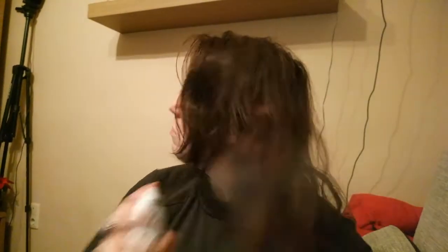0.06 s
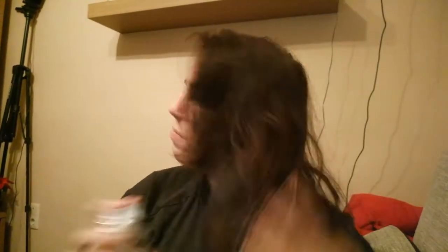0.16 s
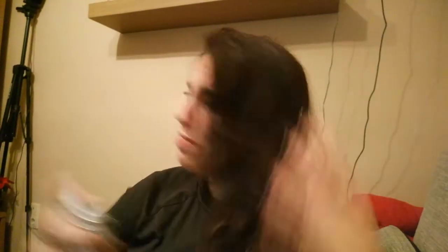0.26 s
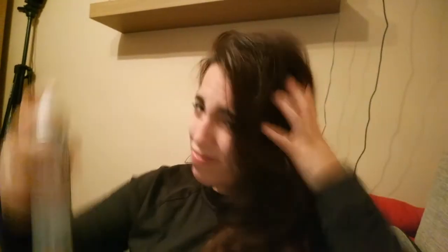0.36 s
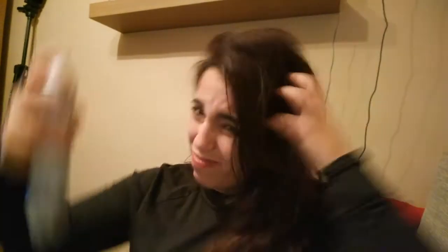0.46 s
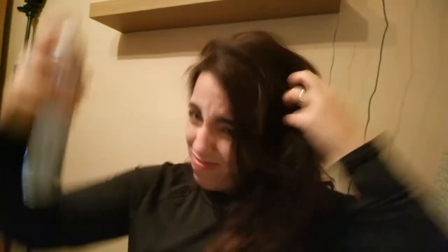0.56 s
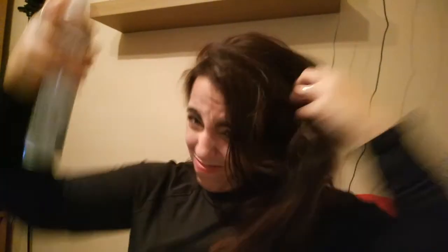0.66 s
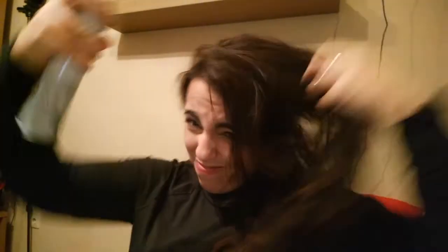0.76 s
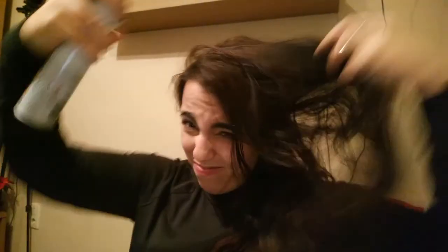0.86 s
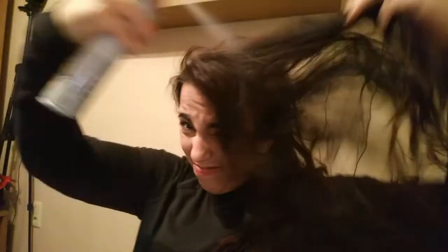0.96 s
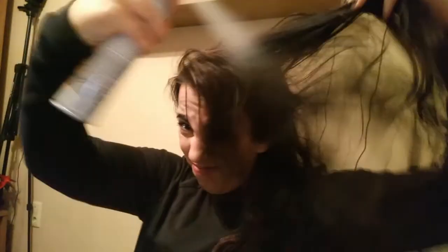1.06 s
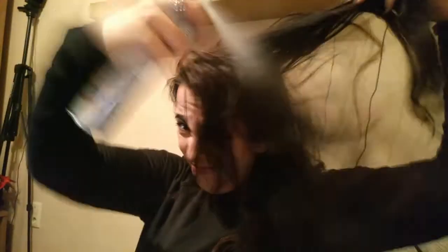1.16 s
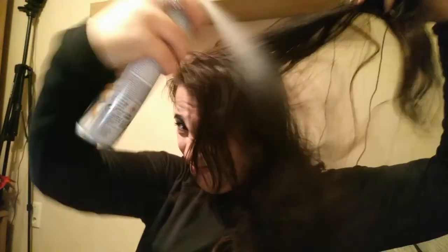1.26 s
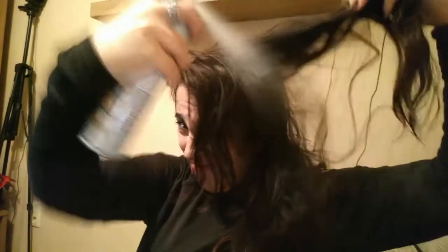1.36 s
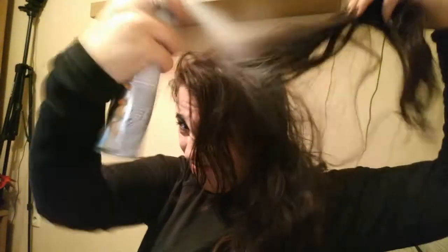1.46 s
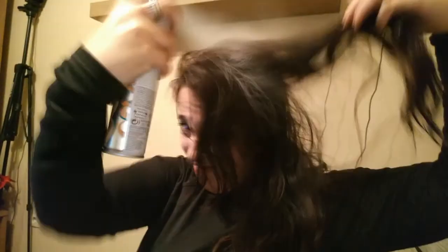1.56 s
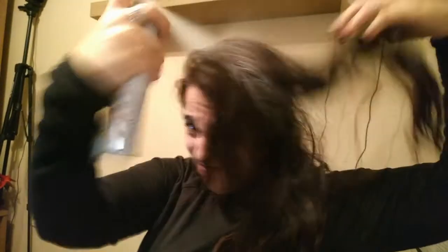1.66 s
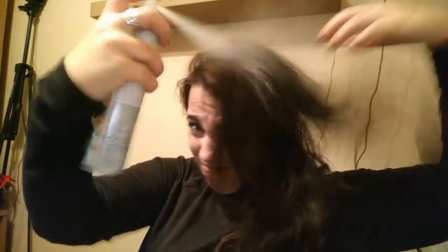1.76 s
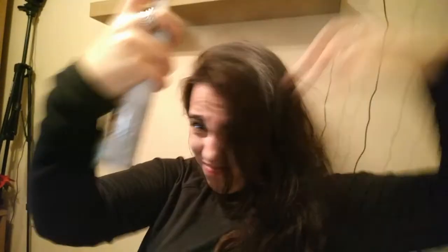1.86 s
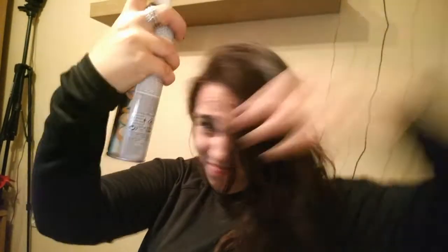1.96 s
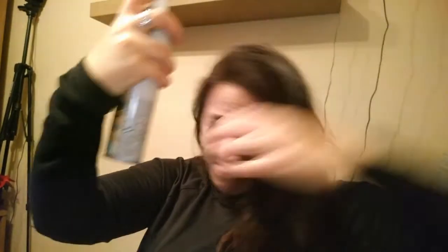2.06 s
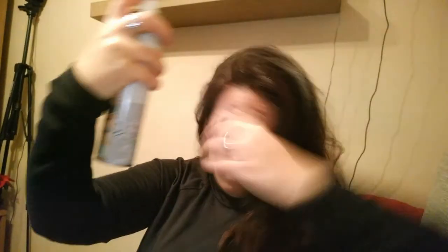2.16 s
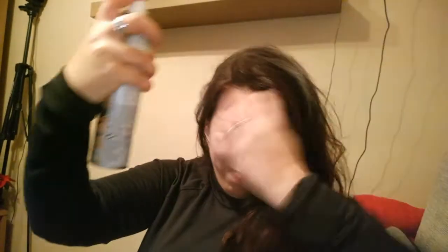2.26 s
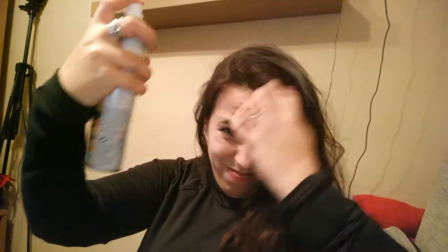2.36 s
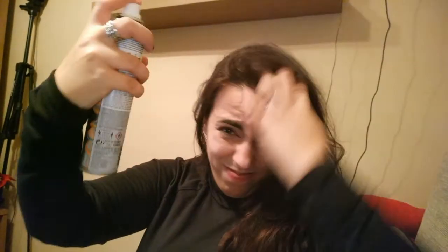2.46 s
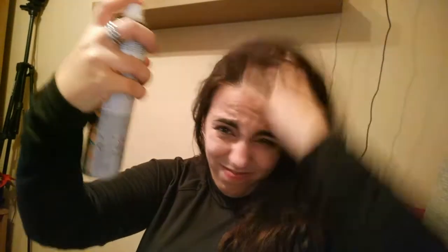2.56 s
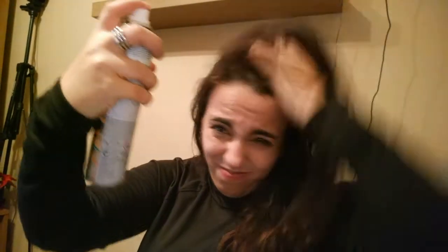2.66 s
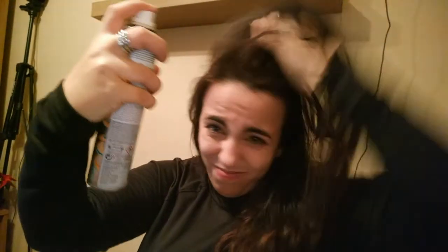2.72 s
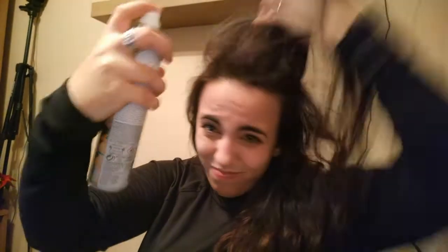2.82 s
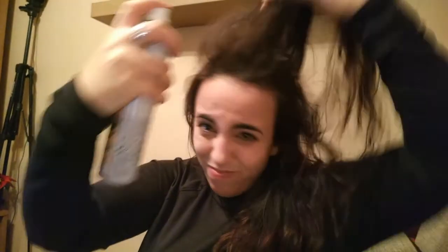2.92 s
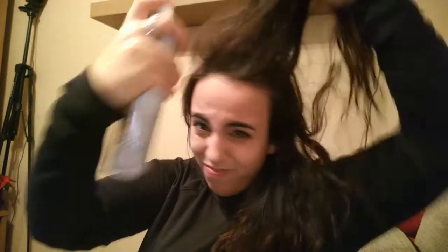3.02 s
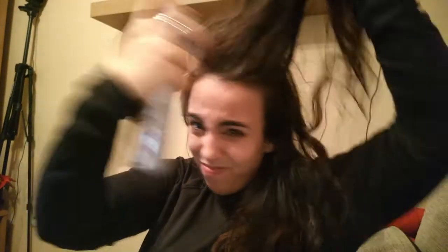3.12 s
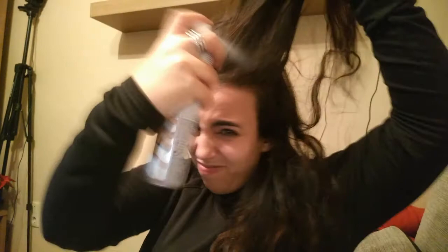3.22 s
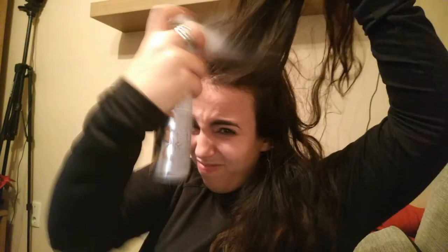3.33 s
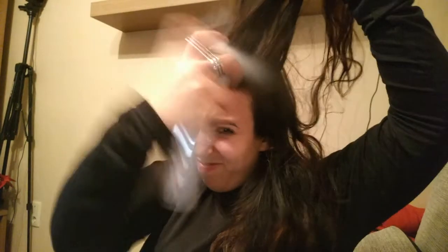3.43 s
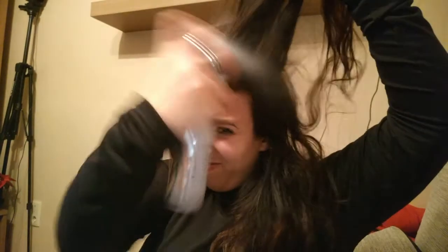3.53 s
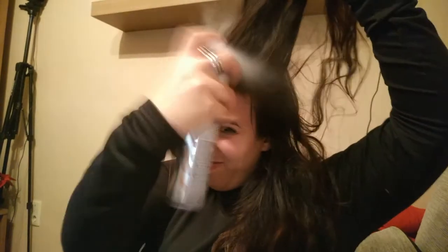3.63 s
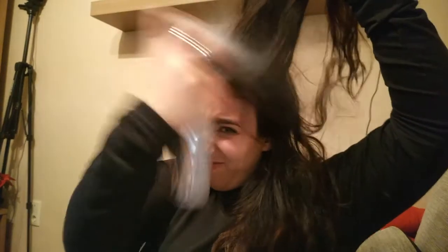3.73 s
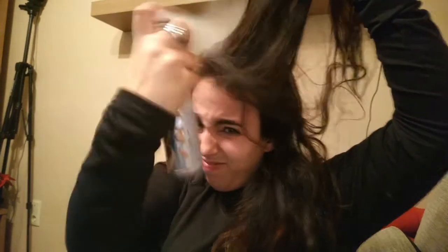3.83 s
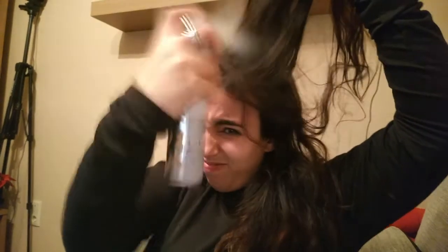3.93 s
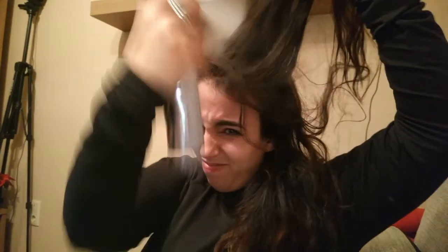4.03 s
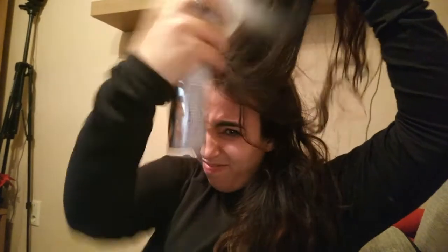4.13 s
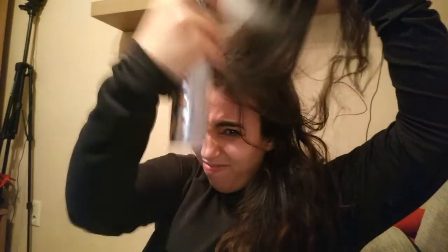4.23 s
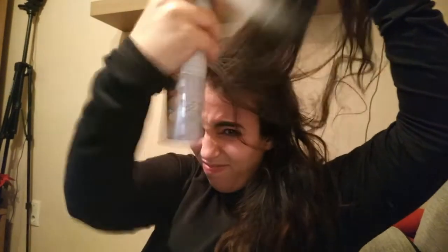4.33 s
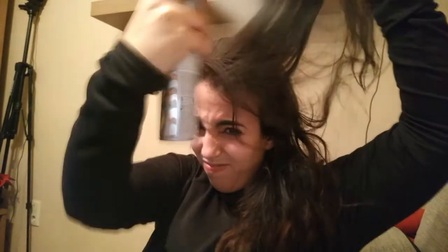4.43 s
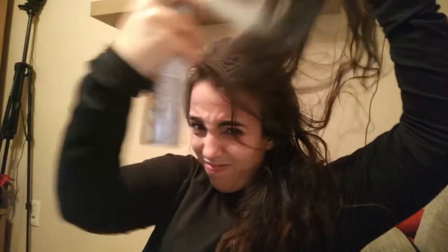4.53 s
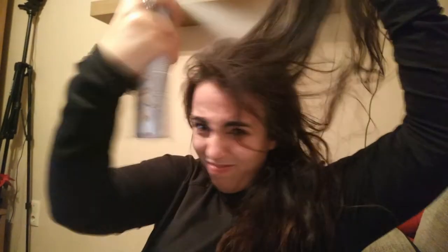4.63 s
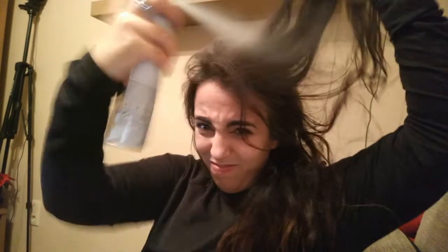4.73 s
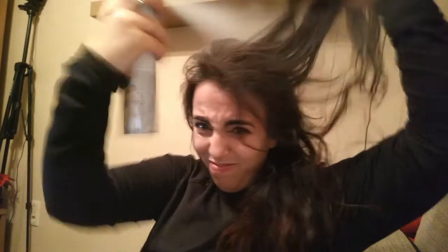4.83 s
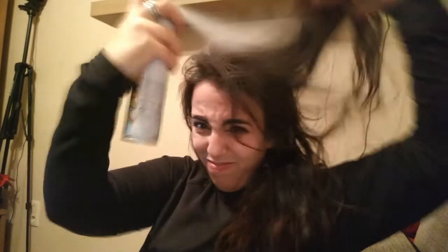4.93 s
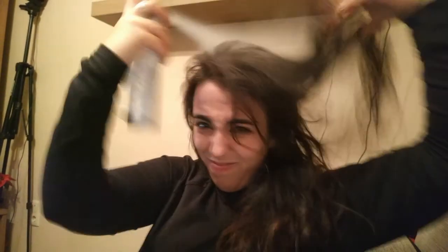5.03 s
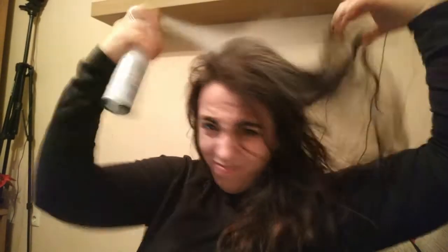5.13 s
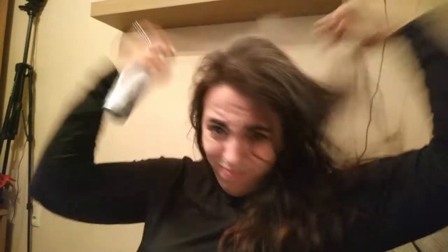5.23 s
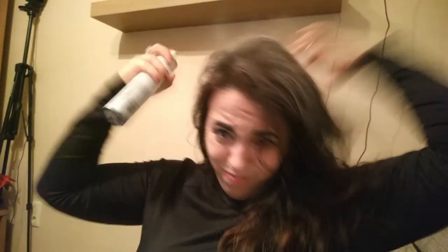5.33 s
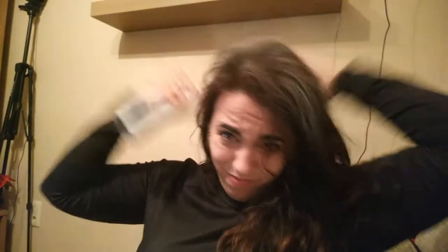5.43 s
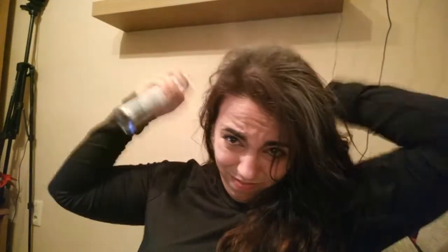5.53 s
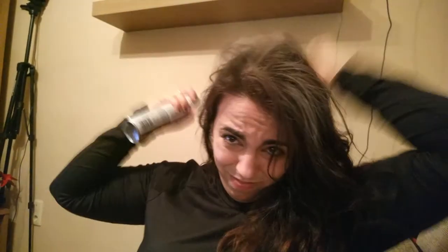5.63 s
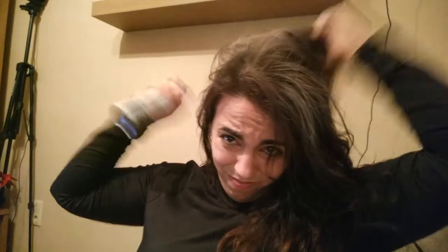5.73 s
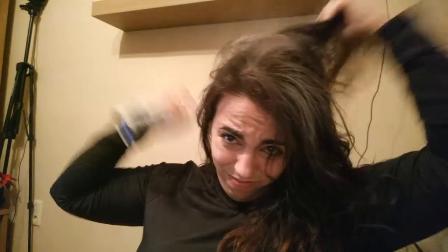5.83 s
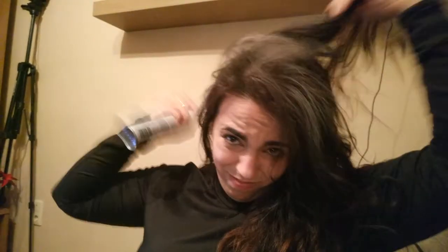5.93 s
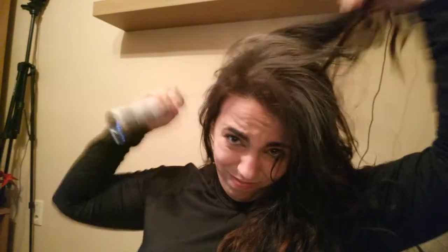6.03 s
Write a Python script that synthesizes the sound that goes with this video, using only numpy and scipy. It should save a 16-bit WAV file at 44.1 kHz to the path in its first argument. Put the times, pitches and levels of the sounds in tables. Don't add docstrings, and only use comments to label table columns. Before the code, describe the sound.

The last echo of a spray dies away in a small furnished room. After a short near-silence an aerosol can hisses for just under a second, stops cleanly, and the button creaks faintly. Then a long spray hisses on to the end, bright with a duller roar and hollow can tone, shifting as the can is waved. A phone about an arm's length away picks it up in stereo over a faint fan-like floor.

```python
import sys
import numpy as np
from scipy import signal
from scipy.fft import rfft, irfft, next_fast_len
from scipy.io import wavfile
from scipy.ndimage import uniform_filter1d

SR = 44100
rng = np.random.default_rng(int(sys.argv[2]) if len(sys.argv) > 2 else 0)


def decibels_to_gain(level_db):
    exponent = np.asarray(level_db, float) / 20
    return 10 ** exponent


def int16_out(signal):
    q = np.round(np.clip(np.atleast_2d(signal).T, -1, 1) * 32767)
    wavfile.write(sys.argv[1], SR, q.astype(np.int16))


N = 268128
LEAD_IN = 13230
TOTAL = next_fast_len(N + LEAD_IN + SR)
HZ = np.fft.rfftfreq(TOTAL, 1 / SR)
T = (np.arange(TOTAL) - LEAD_IN) / SR

# valve cracks in seconds, first flow in dB re full, fully open in seconds,
# let go in seconds, full flow in dB.
PRESSES = [
    (-.4, -5, -.3, -.062, -21.5),
    (.942, -6, 1.004, 1.813, -21.6),
    (3.112, -19, 3.184, 6.3, -20.6),
]
# time in seconds, turn from 0 to 1.
NOZZLE_TURN = [(0, .6), (.95, .3), (1.15, .33), (1.3, .03), (1.5, .3), (1.64, .4), (1.74, .3), (1.82, .35),
               (3.15, .0), (3.5, .08), (3.95, .05), (4.13, .33), (4.4, .2), (4.8, .27), (5.1, .7),
               (5.5, .85), (5.7, .95), (6.08, 1.1)]
# centre in Hz, width in Hz, level in dB.
CAN_MODES = [(812, 78, 3.5), (702, 40, -6), (1444, 70, -9.5), (1900, 180, -10), (2327, 85, -13)]
# start in seconds, peak in dB, pitch in Hz, left minus right in dB.
CREAKS = [
    (2.497, -42, 8000, 7),
    (2.499, -30, 3820, -19),
    (2.5022, -26, 8470, 24),
    (2.504, -33, 4850, -8),
    (2.5068, -32, 3700, 4),
    (2.5097, -34, 6000, 2),
    (2.522, -35, 5400, 2),
]
# centre in seconds, peak in dB, pitch in Hz, length in seconds.
THUDS = [
    (5.385, -44.5, 227, 0.024),
    (5.40, -38, 465, 0.009),
    (5.433, -43, 230, 0.034),
    (5.605, -51, 212, 0.024),
    (5.853, -49.5, 264, 0.031),
]
# frequency in Hz, gain in dB.
LEFT_PORT = [(60, -60), (150, -50), (300, -27.5), (1150, -22.5), (2000, -18), (2750, -19.5), (3400, -18),
             (5000, -16), (7000, -7), (8500, -4), (10200, 5.5), (11500, 2), (12800, 0.5), (15600, 1)]
RIGHT_PORT = [(60, -65), (150, -26), (300, -17.5), (1150, -11), (2000, -8), (2750, -10.5), (3500, -2),
              (4500, -1), (5800, -4), (7500, -2), (9500, 4), (11000, -0.5), (12500, -2.5), (15600, -4)]
# frequency in Hz, correlation from 0 to 1.
LIKENESS = [(60, 0.11), (130, 0.63), (300, 0.51), (700, 0.73), (1400, 0.39), (3000, 0.27), (7000, 0.18),
            (15000, 0.076)]
# frequency in Hz, density in dB per Hz.
FLOOR_SPECTRUM = [(24, -83), (40, -55), (109, -24.5), (143, -27.5), (162, -3), (242, -2.5), (275, 5),
                  (311, -15.5), (335, -1.5), (464, -6), (643, -3.5), (766, -8), (4880, -17.5), (9820, -14),
                  (15800, -21.5)]
# frequency in Hz, left minus right in dB.
FLOOR_TILT = [(60, -6), (110, -26), (200, -2.5), (380, 0), (700, -0.5), (1290, -4.5), (2380, -2),
              (4400, -4), (8120, 2.0), (15000, 6.5)]
# frequency in Hz, threshold in dB re local level.
MASKING_LINE = [(2200, -9), (2900, -2), (4000, -1.2), (7500, -1), (9000, -2.4), (10500, -2.6),
                (12000, -1.4), (15800, -1.3)]

HALF_SIDES = np.array([[.5], [-.5]])


def unit(x):
    return x / np.sqrt(np.mean(x ** 2))


def along(table):
    hz, value = np.transpose(table)
    return np.interp(np.log(HZ + 1), np.log(hz), value)


def shape(x, gain):
    return irfft(rfft(x, TOTAL) * gain, TOTAL)


def resonance(hz, width_hz):
    return 1j * HZ * width_hz / (hz ** 2 - HZ ** 2 + 1j * HZ * width_hz)


def noise_pair():
    alike = np.clip(along(LIKENESS), 0, 1)
    mid, side = rng.standard_normal((2, TOTAL))
    mid = shape(mid, np.sqrt(1 + alike))
    side = shape(side, np.sqrt(1 - alike))
    return np.array([mid + side, mid - side]) / 2


def walk(rate):
    hold = max(int(SR / rate), 1)
    steps = np.repeat(rng.standard_normal(TOTAL // hold + 1), hold)[:TOTAL]
    return unit(uniform_filter1d(uniform_filter1d(steps, hold), hold))


def jet_noise():
    sputter = decibels_to_gain(2.0 * walk(400) + 1.0 * walk(40))
    top = 1 / (1 + (8200 / (HZ + 1)) ** 8)
    hiss = shape(sputter * rng.standard_normal(TOTAL), np.sqrt(top)) * decibels_to_gain(0.61 * walk(33))
    roar = shape(sputter * rng.standard_normal(TOTAL), np.sqrt(1 - top)) * decibels_to_gain(0.51 * walk(4.8))
    return hiss, roar


def singing_can():
    modes = sum(decibels_to_gain(db) * resonance(hz, width_hz) for hz, width_hz, db in CAN_MODES)
    return unit(shape(rng.standard_normal(TOTAL), modes)) * decibels_to_gain(1.5 * walk(9))


def leak(hiss):
    peak_s, peak_db, rise_db_per_s, fall_db_per_s = .418, -46.5, 500, 450
    below_db = np.maximum(rise_db_per_s * (peak_s - T), fall_db_per_s * (T - peak_s))
    return decibels_to_gain(peak_db - below_db) * hiss


def spray():
    hiss, roar = jet_noise()
    can = singing_can()
    wave_db = 1.0 * walk(7)
    turn = np.interp(T, *np.transpose(NOZZLE_TURN))
    seep_s, crack_s, snap_s, surge_s, let_go_s = .052, .009, .009, .08, .06
    out = leak(hiss)
    for cracks, first_db, opens, shuts, flow_db in PRESSES:
        seeps = cracks - crack_s - seep_s
        stages = [seeps, cracks - crack_s, cracks, opens - snap_s, opens]
        lost_db = np.interp(T, stages, [-42, -34, first_db, -4.5, 0])
        can_wakes_db = np.interp(T, stages, [-42, -32, -14, -11, 0])
        surge_db = 1.2 * np.exp(-np.abs(T - opens) / surge_s) * (T > opens)
        choke = np.clip(-lost_db / 20, 0, 1)
        closing = np.clip(1 + (T - shuts) / let_go_s, 0, 1)

        roar_db = -3.5 - 11 * turn - 3.5 * closing + 5.5 * choke
        can_db = -14.3 - 11 * turn - 6 * closing + can_wakes_db - lost_db
        hiss_lean_db = 2.8 + 1.2 * turn + 5 * closing + 8 * choke + wave_db - 3.0
        roar_lean_db = -6 + 3 * turn + 7 * closing + 4 * choke + wave_db + 8.5

        low = decibels_to_gain(roar_db + 9.5) * roar + decibels_to_gain(can_db + 13.5) * can
        jet = decibels_to_gain(HALF_SIDES * hiss_lean_db) * hiss + decibels_to_gain(HALF_SIDES * roar_lean_db) * low
        valve = np.clip((T - seeps) / 0.003, 0, 1) * np.clip((shuts + 0.0063 - T) / .012, 0, 1)
        thrown_back_db = 1.3 * turn
        out = out + valve * decibels_to_gain(flow_db + lost_db + surge_db + thrown_back_db + 4.5) * jet
    return out


def creaks():
    out = np.zeros((2, TOTAL))
    age = np.arange(400) / SR
    for start_s, db, hz, lean_db in CREAKS:
        ring = np.sin(2 * np.pi * hz * age) * np.exp(-age / 0.00026)
        ring = ring + 0.38 * rng.standard_normal(400) * np.exp(-age / 0.0045)
        ring = ring * np.clip(age / 0.00012, 0, 1)
        i = LEAD_IN + int(start_s * SR) - 16
        out[:, i:i + 400] += decibels_to_gain(db + HALF_SIDES * lean_db) * ring
    plastic = resonance(4600, 2600) + 0.36 * resonance(9100, 4500) + .02
    no_bass = HZ ** 2 / (HZ ** 2 + 2000. ** 2)
    port_limits = 1 / (1 + (HZ / np.array([[12000.], [9500.]])) ** 6)
    return shape(out, plastic * no_bass * port_limits)


def thuds():
    out = 0
    for centre_s, db, hz, length_s in THUDS:
        rumble = unit(shape(rng.standard_normal(TOTAL), resonance(hz, 0.24 * hz) ** 2))
        out = out + decibels_to_gain(db) * np.exp(-((T - centre_s) / length_s) ** 2) * rumble
    return np.outer(decibels_to_gain([-3.5, 3.5]), out)


def room(x, direct_db, wander):
    stay, tail_length = 4500, 16384
    t60_low_s, t60_high_s = .28, .27
    age = np.arange(tail_length) / SR
    onset = np.clip((age - .002) / 0.0065, 0, 1)
    decay_low, decay_high = 1000. ** (-age / t60_low_s), 1000. ** (-age / t60_high_s)
    treble = HZ ** 2 / (HZ ** 2 + 2700.0 ** 2)
    echoes = noise_pair()
    low, high = shape(echoes, 1 - treble), shape(echoes, treble)
    window = np.sin(np.pi * np.arange(2 * stay) / (2 * stay))
    starts = range(0, TOTAL - tail_length - 2 * stay, stay)
    chance = rng.random((len(starts), 3, 1))
    all_lags = wander * (chance[:, :2] + 6 * chance[:, 2:])
    out = np.zeros((2, TOTAL))
    for i, lags in zip(starts, all_lags):
        tail = onset * (low[:, i:i + tail_length] * decay_low + high[:, i:i + tail_length] * decay_high)
        direct = decibels_to_gain(direct_db) * np.sinc(np.arange(tail_length) - 16 - lags)
        paths = direct + tail / np.sqrt(np.sum(tail ** 2) / 2)
        piece = x[:, i:i + 2 * stay] * window
        out[:, i:i + 2 * stay + tail_length - 1] += signal.fftconvolve(piece, paths, axes=1)
    return out


def background():
    tilt_db = along(FLOOR_TILT) * HALF_SIDES
    air = unit(shape(noise_pair(), decibels_to_gain(along(FLOOR_SPECTRUM) + tilt_db)))
    hum = unit(shape(noise_pair(), resonance(666, 31) ** 2))
    return decibels_to_gain(-58 + 0.42 * walk(2.87)) * air + decibels_to_gain(-73 + 1.1 * walk(2.4)) * hum


def scene():
    ports = decibels_to_gain(np.array([along(LEFT_PORT), along(RIGHT_PORT)]))
    jet = shape(room(spray(), direct_db=-5.5, wander=13.82), ports)
    hits = decibels_to_gain(7.0) * room(creaks() + decibels_to_gain(-10.5) * thuds(), direct_db=-6.0, wander=0)
    return (jet + hits + background())[:, LEAD_IN:LEAD_IN + N]


def mute_masked(x):
    frames = dict(window="cosine", nperseg=2048, noverlap=1024)
    offset = 906
    hz, _, z = signal.stft(np.pad(x, ((0, 0), (offset, 0))), SR, **frames)
    power = np.abs(z) ** 2
    local = uniform_filter1d(power, size=44, axis=1) + 1e-20
    share = np.mean(power / local, axis=0)
    patch = uniform_filter1d(uniform_filter1d(share, size=5, axis=0), size=2, axis=1)
    line_db = np.interp(hz, *np.transpose(MASKING_LINE), -60)
    kept = patch > decibels_to_gain(line_db)[:, None] ** 2
    return signal.istft(z * kept, SR, **frames)[1][:, offset:offset + N]


def top_cut(x):
    return signal.sosfilt(signal.butter(12, 15800, fs=SR, output="sos"), x)


def record(dry):
    mix = mute_masked(dry)
    return top_cut(mix)


dry = scene()
out = record(dry)
int16_out(out)
```